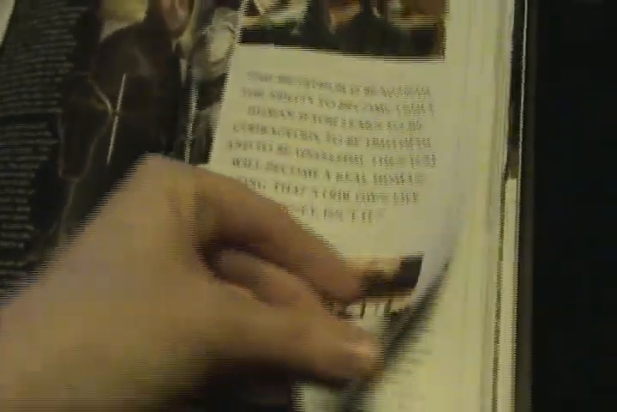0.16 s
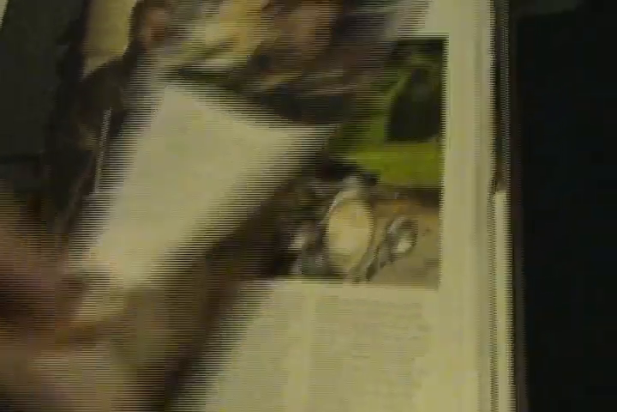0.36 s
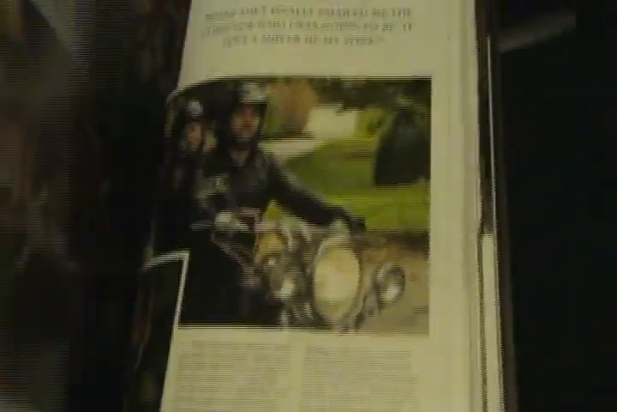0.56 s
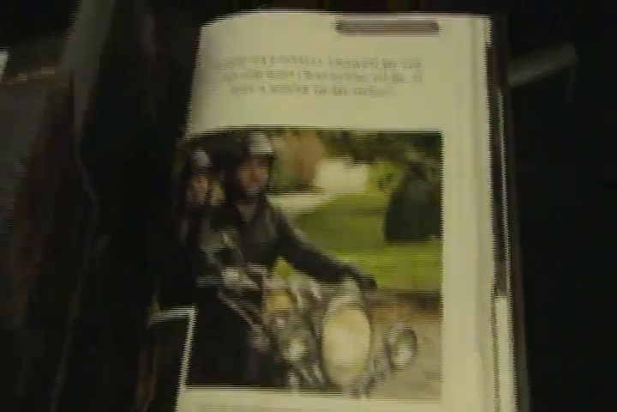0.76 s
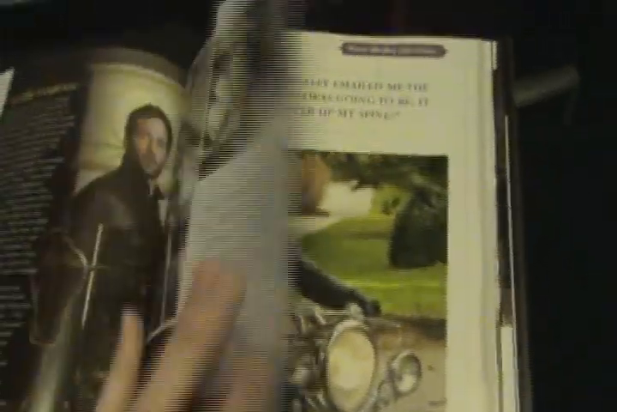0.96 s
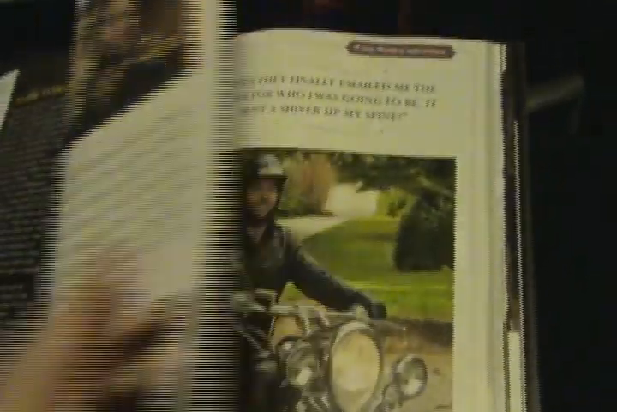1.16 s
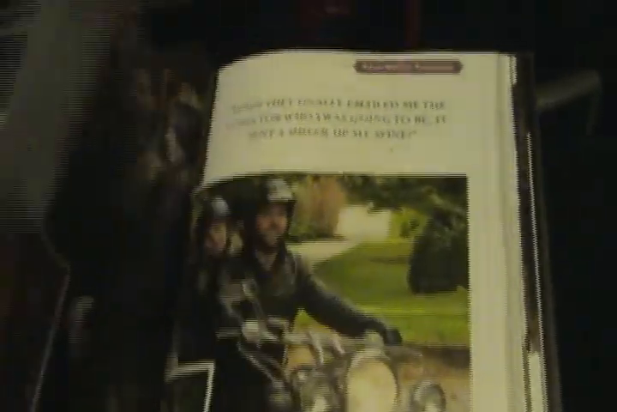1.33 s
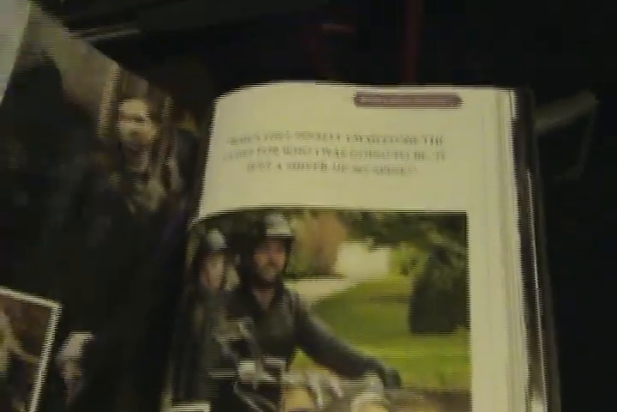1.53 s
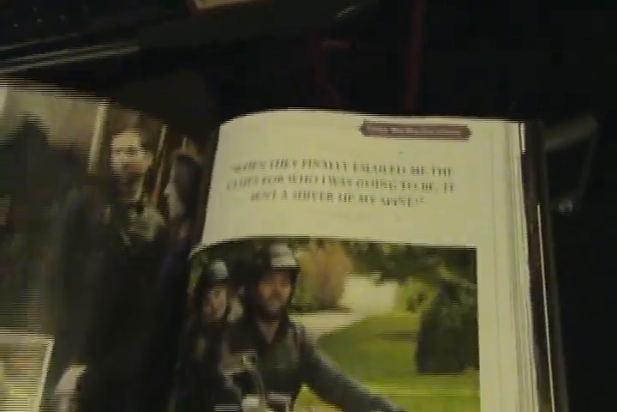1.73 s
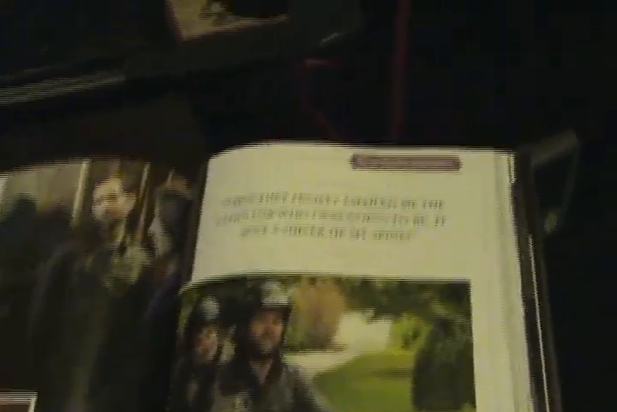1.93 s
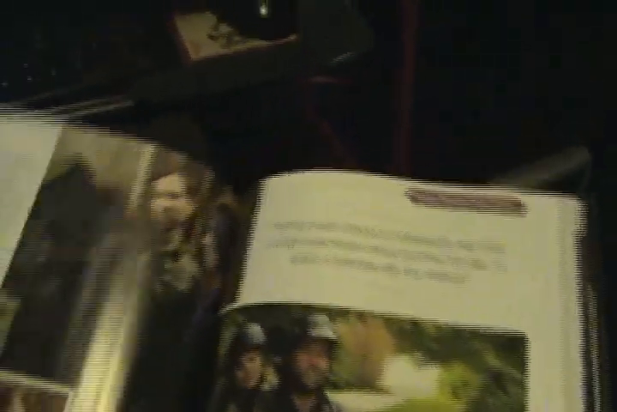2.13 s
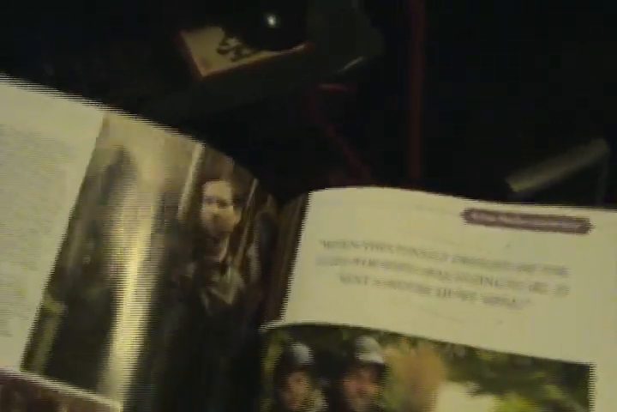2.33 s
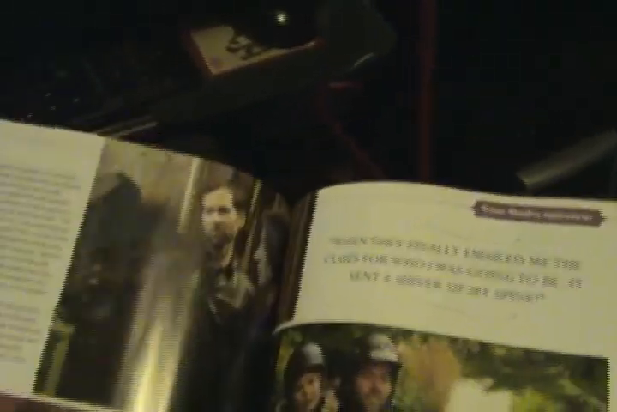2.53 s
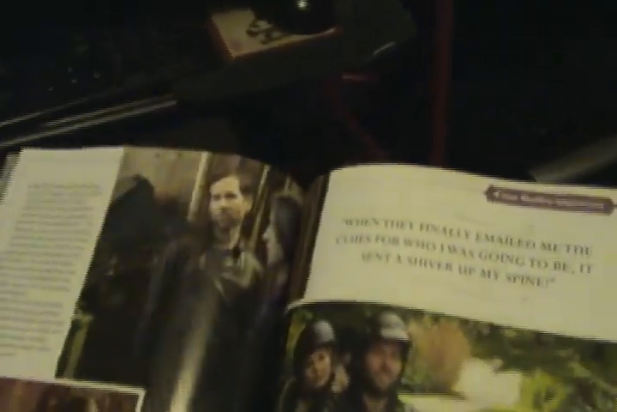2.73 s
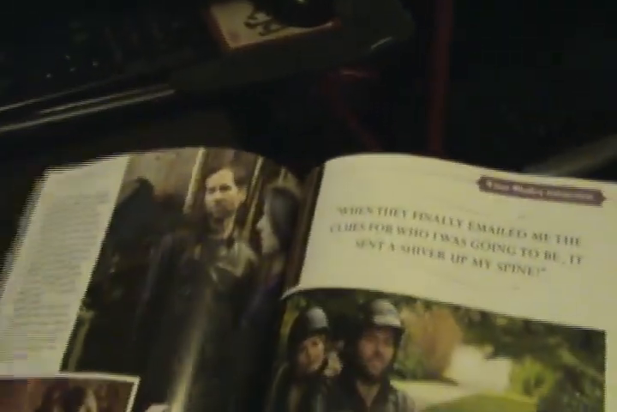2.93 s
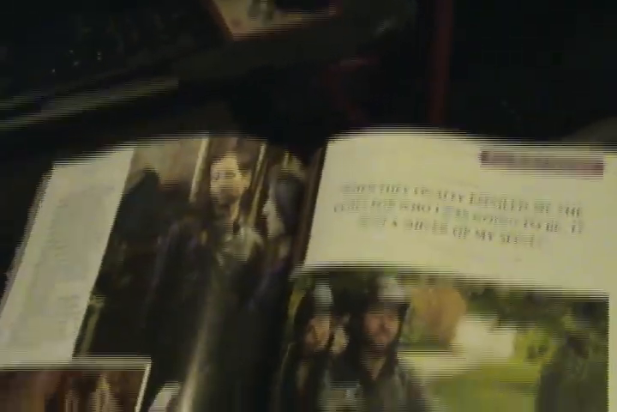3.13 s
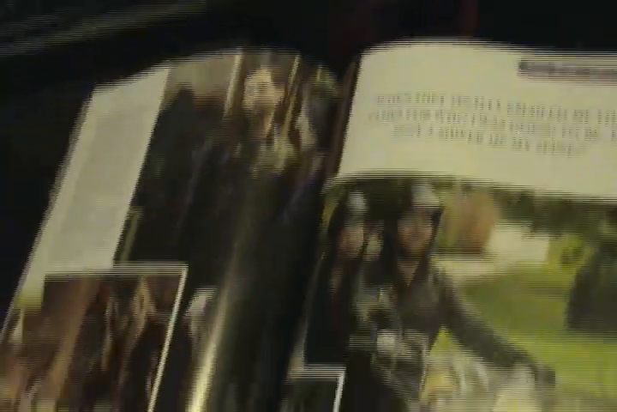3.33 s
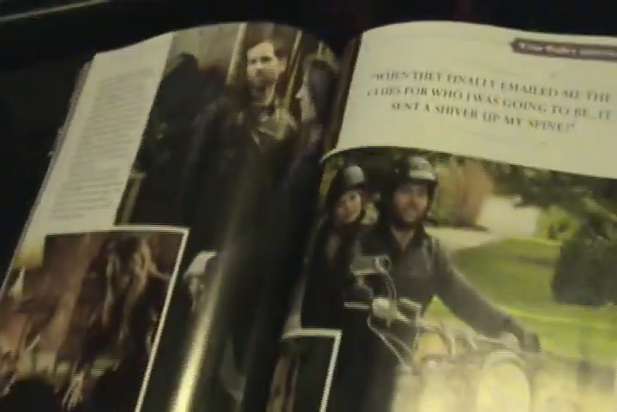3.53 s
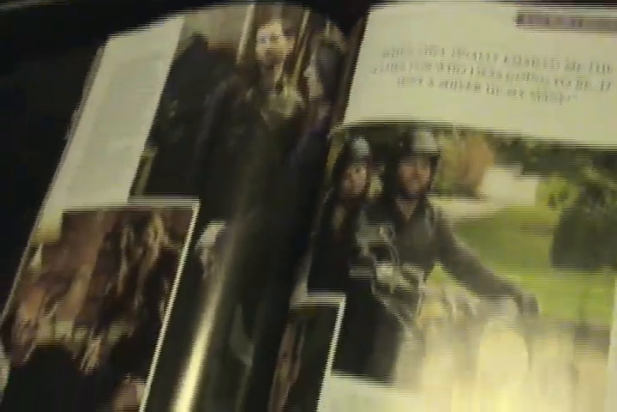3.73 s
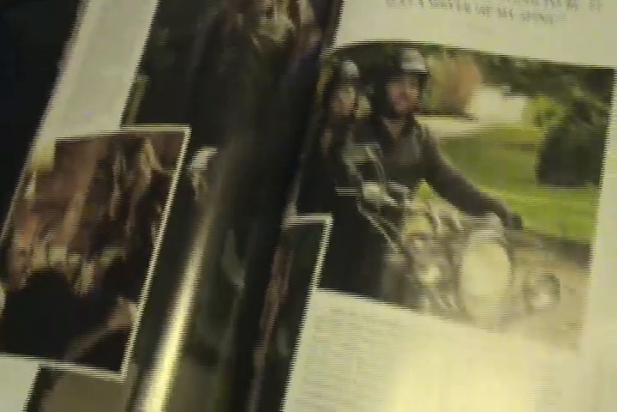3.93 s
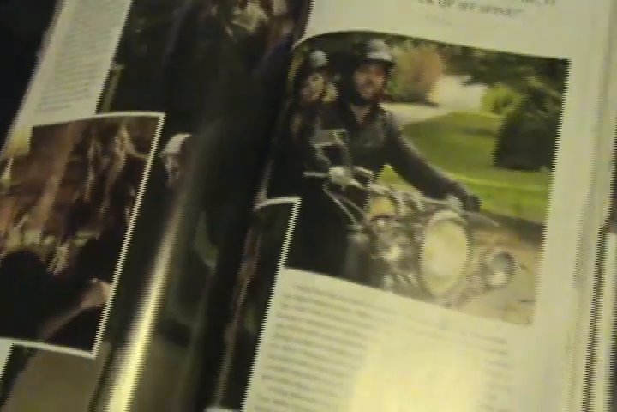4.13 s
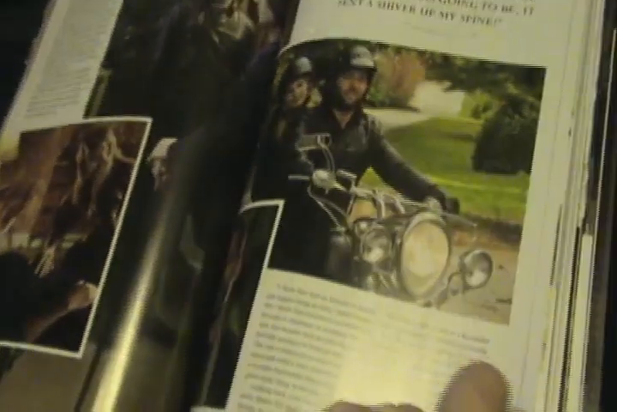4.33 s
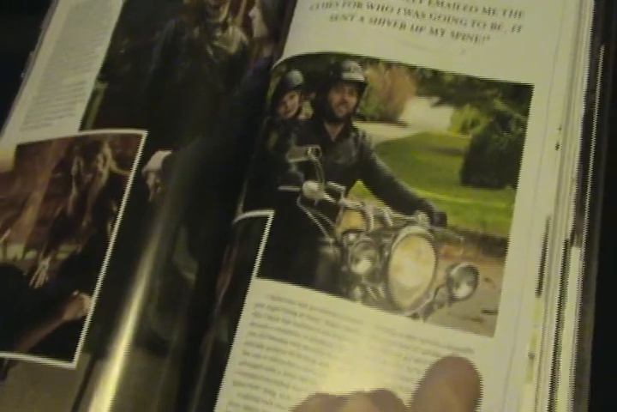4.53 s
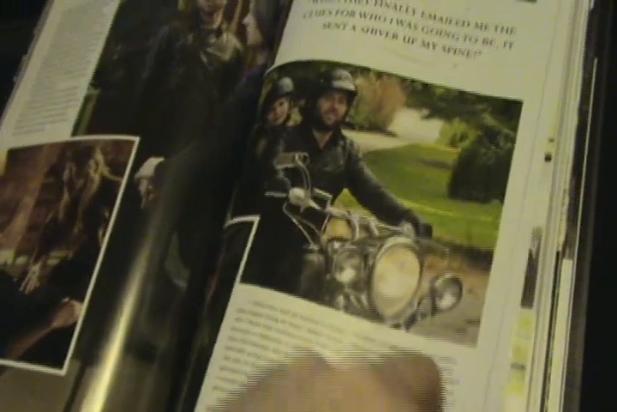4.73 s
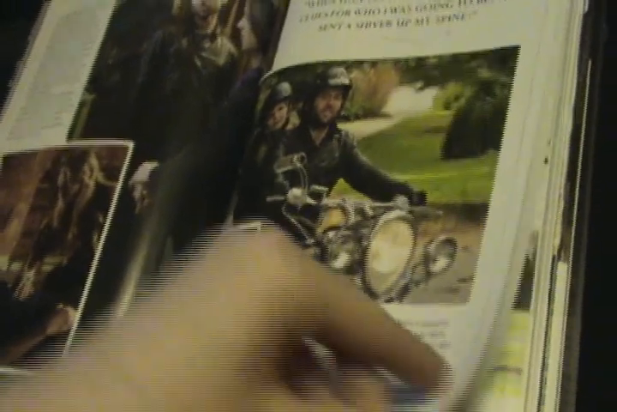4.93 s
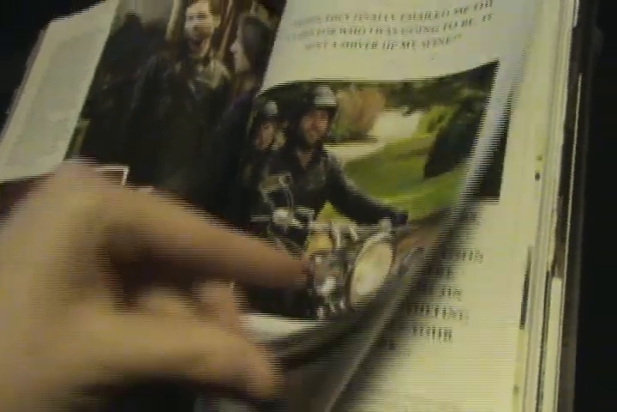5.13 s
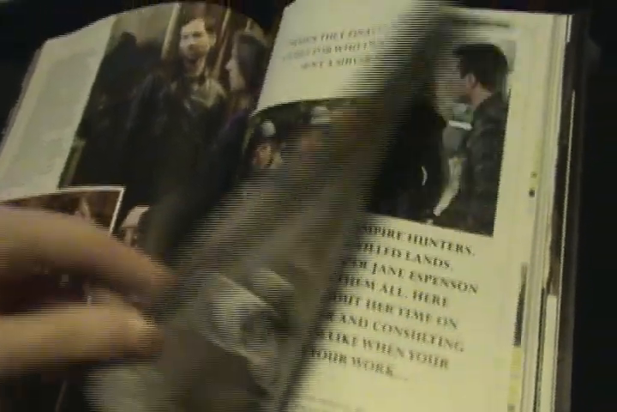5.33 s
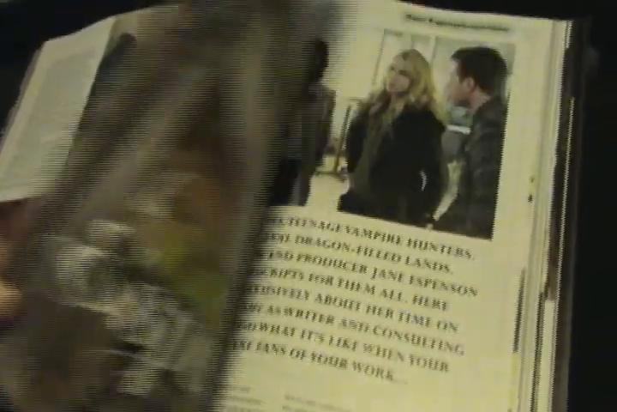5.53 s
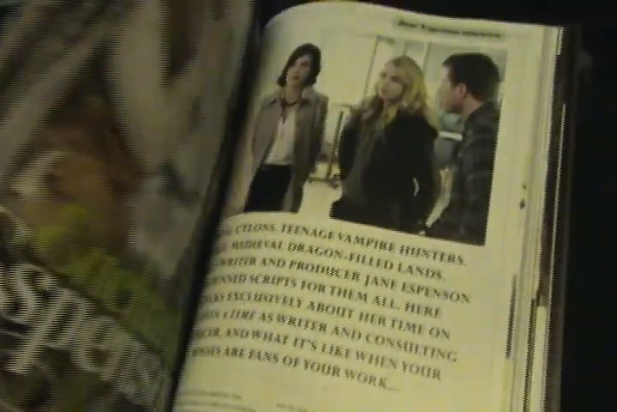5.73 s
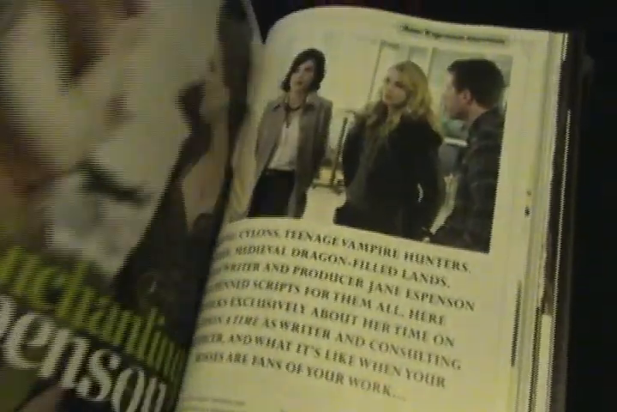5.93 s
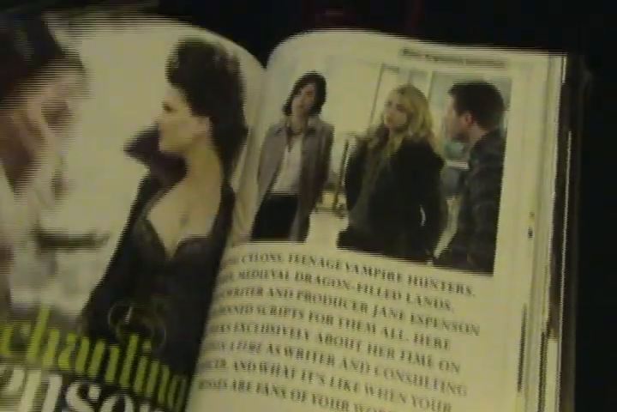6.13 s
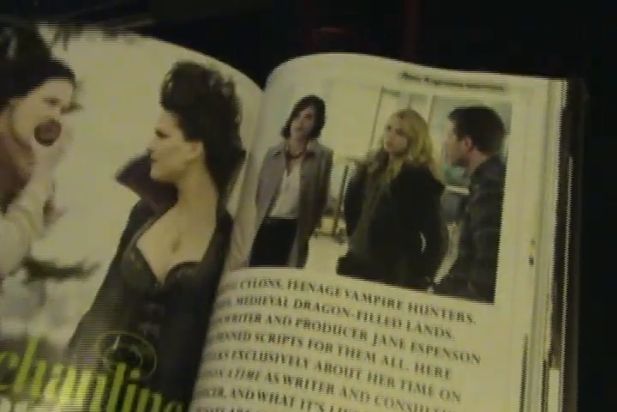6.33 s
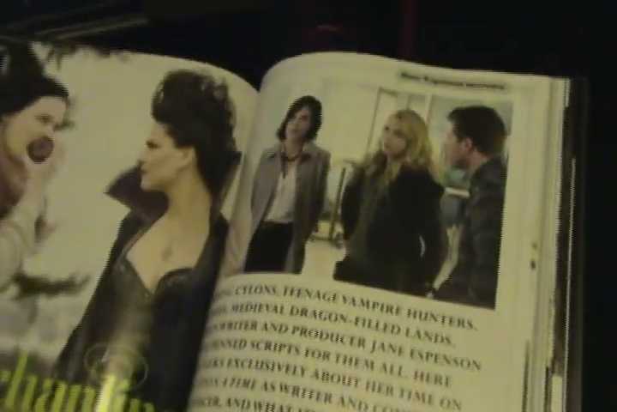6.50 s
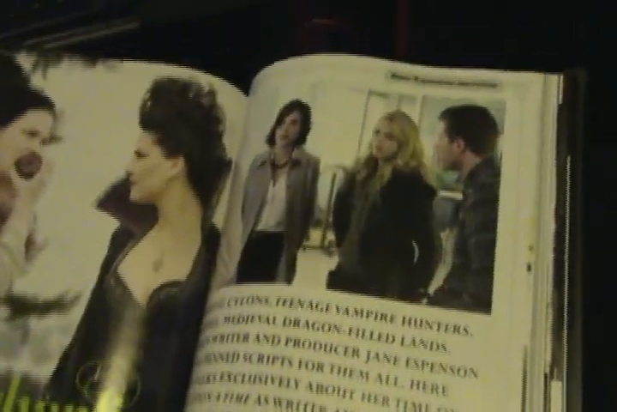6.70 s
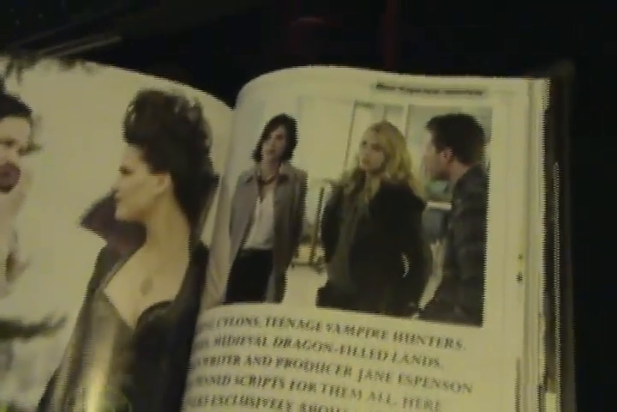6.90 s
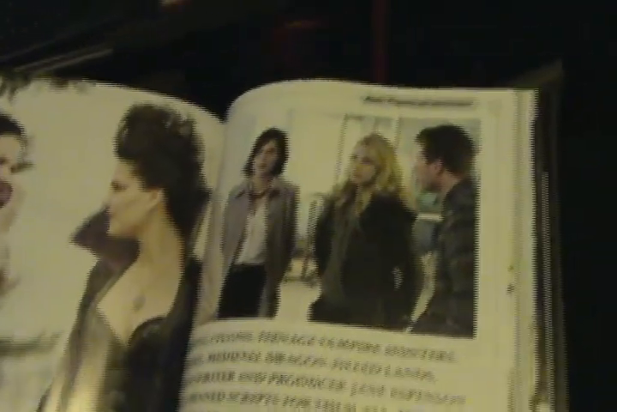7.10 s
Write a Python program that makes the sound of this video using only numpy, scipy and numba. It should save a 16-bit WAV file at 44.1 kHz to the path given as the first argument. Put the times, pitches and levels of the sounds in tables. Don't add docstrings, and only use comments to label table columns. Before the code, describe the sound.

A thick glossy magazine is handled very close to a small stereo microphone in a quiet, fairly dry room. From 0 s a page bends and crackles, with a crisp snap at about 0.1 and a fluttering flap around 0.5. Duller crumples follow near 0.9, then the loudest, densest crackling runs from 1.0 to 1.55, with air puffs and soft thumps of the stack. Around 2.0 to 2.4 come sharp ticks, a short binding creak and small knocks. From 2.5 to 4.2 there is mostly faint rustle and light finger rubbing. Small dry snaps come at 4.3 to 4.7, and a stiff crease at 5.0. Another page turns softly, riffles at 5.6 and lands with a sharp tap at 5.8. Tiny rustles fade by 6.4, leaving a low wavering fan drone, light hiss and a barely audible high whine until about 7.3.

```python
import sys
import numpy as np
from scipy import signal
from scipy.fft import rfft, irfft
from scipy.io import wavfile
from scipy.ndimage import uniform_filter1d
from numba import njit

SR = 44100
rng = np.random.default_rng(int(sys.argv[2]) if len(sys.argv) > 2 else 0)


def level_to_linear(level):
    exponent = np.asarray(level, float) / 20
    return 10 ** exponent


def inscribe(sig):
    pcm = np.round(np.clip(np.atleast_2d(sig).T, -1, 1) * 32767)
    wavfile.write(sys.argv[1], SR, pcm.astype(np.int16))


N = 320166

# [peak t/s, level/dB, length/ms, ring f/Hz]
CRISP_CRACKS = [(.116, -33, .6, 4500), (.119, -31.5, .72, 5100), (.354, -41, 0.72, 7000),
                (.782, -37.5, 4.2, 1770), (1.5015, -29, 2.5, 4230), (1.9728, -43.5, 2.4, 3820),
                (1.987, -47.5, 26, 1560), (2.2113, -40.5, 3.1, 2900), (2.0925, -33, 1.5, 3000),
                (2.121, -44, 1.5, 7000), (.4785, -28, 5, 2800), (.492, -36, 2, 4800), (.51, -39, 2, 5500),
                (.082, -48, 1.5, 7000), (.094, -43, 1.2, 6000), (.9645, -46, 1.2, 7000),
                (1.714, -46, 3, 6000), (5.521, -52, 3, 4000), (2.7974, -46.5, 4.4, 1960),
                (3.3466, -41.5, 0.89, 5650), (4.3105, -38.5, 0.67, 3670), (4.5045, -38, 1.1, 4900),
                (4.6035, -34.5, 1.34, 3950), (4.7103, -43.6, 1.8, 2130), (4.743, -45.5, .8, 3390),
                (5.7623, -48, 1.1, 2100), (5.7948, -30.5, 1.8, 2120), (5.804, -44, 2.8, 1510),
                (5.84, -39, 2.1, 1900), (6.2232, -52.5, 5, 1860)]
DULL_CRACKS = [(.093, -36, 12, 2400), (2.2847, -41, 1.5, 4500), (2.285, -38, 1.5, 1600),
               (5.4691, -48, 1, 1100), (5.4847, -44, 2.5, 1300), (1.506, -24, 6, 2050),
               (.1315, -20.5, 4, 2480), (.346, -28, 6.5, 1300), (.3631, -37, 9, 1750),
               (.5116, -27, 53, 1900), (.8078, -39.5, 12, 1200), (.8717, -28.5, 17, 1390),
               (.8889, -40.5, 6.6, 1550), (1.075, -23.5, 44, 1610), (1.0895, -16, 10, 2540),
               (1.015, -38.5, 8, 1900), (1.0537, -18, 3.3, 3900), (1.058, -17, 5, 2100),
               (1.0905, -28, 4.5, 4600), (1.2625, -36, 5, 6500), (1.381, -24.5, 2.2, 4200),
               (1.47, -39.5, 1, 4500), (4.5575, -45, 2.8, 4500), (4.716, -49.5, 4.5, 6500),
               (5.046, -45, 6, 2600), (5.113, -45.5, 2.9, 4000), (5.119, -54, 6.7, 2400),
               (5.253, -50, 2.7, 3600), (5.755, -45, 2.2, 1100), (5.882, -49, 2, 2000),
               (1.1226, -22.5, 1.5, 1860), (1.137, -36.5, 6.5, 1600), (1.2547, -30.5, 1.7, 5600),
               (1.3195, -33.5, 1.6, 4200), (1.458, -36, 1.8, 1700), (1.551, -27, 2.2, 3200),
               (1.6758, -45.5, 15, 1540), (4.519, -37.5, 4, 4760), (4.555, -26, 0.72, 4300),
               (4.6895, -33, 0.77, 4030), (5.1145, -45, 5, 900), (6.2916, -44, 5.4, 1460),
               (6.3467, -48, 4.3, 1720)]
# [peak t/s, level/dB, length/ms, ring f/Hz]
CRISP_STRAINS = [(.0771, -36, 3.3, 5000), (2.0971, -21.5, 2.06, 3700), (2.1758, -47.5, 41, 3180),
                 (2.643, -48, 29, 3540), (2.8826, -55.5, 32, 2390), (4.3902, -46, 1.6, 5130),
                 (4.41, -48, 4.8, 4900), (5.672, -33.5, 1.5, 2670), (5.775, -47, 2.9, 1390)]
DULL_STRAINS = [(.48, -33, 14, 4500), (.5655, -21.5, 14, 2630), (1.6242, -30.5, 8.1, 1430),
                (1.7192, -39.5, 42, 1310), (5.0415, -29.5, 6.2, 6340)]
# [peak t/s, level/dB, length/ms, ring f/Hz]
CRISP_CRUMPLES = [(.0604, -32, 2.4, 6030), (.0655, -30.5, 1.8, 8100), (.2439, -49, 5.5, 3370),
                  (1.023, -45.5, 1, 9000), (1.167, -53, 1, 9000), (1.513, -43.5, 0.93, 9000),
                  (5.27, -55, 1, 8530), (5.2855, -47.5, 1.3, 8200), (1.226, -46, 3.3, 1400),
                  (1.2461, -42, 3.7, 1460), (1.704, -39.5, 1.9, 4500), (2.1123, -35.5, 4.3, 2680),
                  (4.5359, -45, 1.05, 4830), (5.457, -57, 1.1, 1580), (5.6444, -35, .51, 1990),
                  (6.134, -48, 2.2, 2710)]
DULL_CRUMPLES = [(.052, -34, 3.7, 6100), (.4872, -21, 3.4, 3400), (.527, -18.5, 7, 3160),
                 (.585, -27, 12.3, 1950), (.3935, -38.5, 3.3, 2000), (.7922, -33.5, 6.1, 1444),
                 (.8285, -38, 2.9, 1034), (.8573, -32.5, 13, 1670), (.905, -31, 4, 3300),
                 (.528, -26, 8, 4300), (2.321, -40, 1.5, 1500), (2.363, -42, 2.5, 1500),
                 (.842, -38, 5, 3200), (.962, -44, 5, 1800), (.544, -26, 4, 3500), (5.676, -44, 1.5, 2800),
                 (5.667, -48, 2, 3300), (.9144, -28, 5.8, 1534), (1.1545, -22, 0.58, 1170),
                 (1.172, -35.5, 3.4, 1150), (1.026, -34, 4.7, 2615), (5.3655, -50, 2.8, 1290),
                 (1.2827, -29.5, 25, 1500), (1.3022, -26.5, 2.4, 3000), (1.3552, -17.5, 5.2, 2820),
                 (1.4009, -26, 3.8, 2230), (1.4186, -27.5, 11, 2150), (1.433, -38, 2.3, 2160),
                 (1.042, -20.5, 10.6, 1715), (1.39, -15.5, 4.9, 3366), (1.5183, -20, 3.5, 2100),
                 (2.3214, -34.5, 1.7, 3770), (2.361, -43, 1.4, 4600), (2.365, -43, 1.4, 4600),
                 (6.1558, -41.5, 11.2, 1450)]
CRACK_RISE, STRAIN_FALL = 0.36, 0.35
CRISP_EDGE_DB, DULL_EDGE_DB, EDGE_DB_PER_DB = -10.5, -30, -0.15

# [start t/s, end t/s, level/dB, centre f/Hz]
WIPES = [(0, 0.06, -52.5, 5740), (.05, 0.178, -54.5, 8000), (0.2, 0.397, -54.5, 6460),
         (0.448, 0.497, -44, 7500), (0.831, 0.849, -49, 7400), (1.226, 1.247, -50, 7500),
         (1.26, 1.362, -51, 6500), (1.38, 1.5, -45.5, 4870), (1.46, 1.545, -53, 6500),
         (1.7, 1.93, -59, 5000), (1.98, 2.133, -51, 5470), (2.09, 2.229, -52, 6200),
         (2.605, 2.67, -59, 6800), (2.69, 2.833, -61.5, 6000), (3.065, 3.53, -64.5, 6250),
         (4.95, 5.07, -55, 6100), (5.027, 5.103, -62, 7000), (5.24, 5.305, -63, 4500),
         (5.642, 5.683, -58, 6300), (5.645, 5.69, -54, 2500), (.968, 1.005, -57, 8500),
         (5.787, 5.994, -62, 1420), (5.792, 5.815, -45, 6300), (5.816, 5.994, -60, 6450),
         (6.098, 6.344, -66, 5400)]
# [start t/s, end t/s, level/dB, centre f/Hz]
RUBS = [(1.565, 1.677, -51.5, 6600), (2.1, 2.175, -45, 496), (.85, .93, -41, 850), (1.03, 1.14, -36, 950),
        (.97, .997, -55, 7000), (1.675, 1.75, -46, 1400), (5.648, 5.663, -46, 1100),
        (5.663, 5.682, -48, 900), (2.315, 2.495, -60.5, 6140), (3.686, 3.817, -64.5, 6960),
        (3.78, 3.932, -65, 3650), (3.96, 3.998, -64.5, 6000), (4.098, 4.231, -58, 6900),
        (4.257, 4.335, -58.5, 6050), (4.376, 4.51, -45, 5530), (4.41, 4.513, -50, 3330),
        (4.755, 4.81, -58.5, 2500), (4.76, 4.963, -59, 9100), (5.47, 5.538, -57, 8800)]
WIPE_WIDTH, RUB_WIDTH = 1.15, .45

# [peak t/s, rise/ms, fall/ms, sheet level/dB, flexing stack level/dB]
BENDS = [(0, 50, 90, -52.5, -71), (.13, 110, 230, -69, -56.5), (.524, 214, 37, -46.5, -67),
         (.628, 47, 33, -58, -45.5), (.854, 41, 87, -65, -45), (1.12, 110, 94, -48, -50),
         (1.27, 60, 110, -53, -43), (1.478, 120, 110, -49, -47), (1.72, 60, 25, -56, -54),
         (1.85, 60, 90, -63, -72), (2.04, 35, 97, -55.5, -57), (2.19, 86, 24, -53, -48),
         (2.36, 110, 110, -57, -58), (2.7, 250, 200, -60, -66), (3.25, 110, 165, -57.5, -62),
         (3.82, 130, 280, -64.5, -84.5), (4.4, 185, 330, -62, -71), (4.6, 44, 71, -66.5, -68),
         (5.01, 145, 66, -56.5, -84), (5.2, 60, 130, -94, -67), (5.44, 190, 340, -61.5, -63),
         (5.805, 10, 25, -66, -39.5), (5.9, 46, 50, -60, -52.5), (6.21, 34, 86, -66, -58),
         (6.34, 88, 77, -76, -57), (7.2, 320, 300, -75, -70)]
# [f/Hz, width/Hz]
SHEET_MODES = [(850, 700), (1500, 1100), (2500, 1800), (4000, 2500)]
SHEET_MODES_DB = [7, 0, -12, -4.5]
# [t/s, level/dB, length/ms]
AIR_PUSHES = [
    (.09, -45.5, 36),
    (.51, -36.5, 18),
    (.87, -51, 55),
    (1.079, -57, 29),
    (1.27, -36.5, 22),
    (1.39, -38.5, 21),
    (1.512, -47, 40),
    (1.625, -45, 15),
]

# [t/s, slips, first gap/ms, last gap/ms, first level/dB, last level/dB, f/Hz]
RIFFLE = (5.6122, 10, 2.3, 3.6, -38, -28, 740)
# [peak t/s, level/dB, length/ms, ring f/Hz]
KNOCKS = [(0.0874, -40.5, 20, 446), (0.3666, -43, 11, 643), (0.526, -39, 27, 453), (0.5798, -38.5, 16, 600),
          (0.8777, -37.5, 2.1, 423), (1.155, -33, 2.2, 720), (1.285, -39, 44, 433), (1.3552, -30, 3.4, 613),
          (1.3876, -32.5, 15, 593), (1.5037, -45, 6.5, 600), (1.552, -42, 5.9, 570),
          (1.9885, -31.5, 0.71, 603), (2.0956, -30, 3.24, 520), (2.1137, -27, 1.1, 565),
          (2.2975, -42, 1, 600), (1.628, -39, 7, 420), (2.342, -45, 2.4, 600), (.0888, -34, .6, 800),
          (5.459, -48, .6, 700), (5.655, -42, 2.4, 800), (5.677, -40, 1, 600), (5.1135, -44, 1.5, 1000),
          (2.216, -33, 1.3, 516), (2.2862, -28.5, 0.53, 536), (2.3214, -25, 0.8, 526),
          (2.3635, -30.5, 2.4, 480), (2.884, -54.5, 8.9, 546), (4.6912, -42.5, 0.61, 730),
          (5.4771, -39.5, 0.84, 410), (5.524, -43, 3.22, 437), (5.6452, -33.5, 3.16, 417),
          (5.6731, -29, 0.82, 396), (5.772, -45.5, 4.1, 467), (5.7953, -18.5, 0.17, 520),
          (5.8404, -26, 0.3, 470), (.057, -42, 4.2, 800), (0.076, -36, 2, 500), (4.3112, -45, 0.35, 1010),
          (4.5042, -48, 0.46, 1000), (4.519, -48, 0.54, 1000), (4.537, -49, .5, 900),
          (4.5553, -44, 0.54, 1090), (4.6038, -46, .5, 1110), (4.7105, -44, 0.46, 900), (5.8, -37, 1, 700),
          (5.8055, -39, 0.76, 597), (5.818, -44, 1, 600), (5.859, -44, 1.5, 450)]
# [t/s, slips, gap/ms, first level/dB, last level/dB, slip length/ms, f/Hz]
CREAK = (2.1215, 8, 11.5, -39, -33.5, 2.4, 505)

# [f/Hz, left lead/rad]
PORT_PHASE = [(30, 0), (340, .55), (900, .9), (2400, .5), (4500, .35), (16000, .4)]
# [f/Hz, left minus right level/dB]
PORT_BALANCE = [(60, -1.4), (400, -1.4), (1300, 1.8), (2400, 2.6), (15000, 1.6)]
# [t/s, extra left minus right level/dB]
HAND_SIDE = [(0, -1), (1.4, 0.5), (1.8, 1.5), (3.3, .5), (4, -4.5), (5.2, -1.5), (5.8, 1.5), (7.26, -1)]
ROOM_T60_S, ROOM_DB, ROOM_HZ = .18, -17, 3500

# [f/Hz, density level/dB per Hz]
FLOOR_MID = [(25, -36.5), (55, -8.5), (100, -7), (250, -10), (400, -16.5), (700, -29.5), (1500, -31),
             (16000, -33)]
FLOOR_SIDE = [(15, -64.5), (25, -35.5), (175, -2), (591, -7), (887, -4), (14000, -27.5), (16000, -44.5)]
FLOOR_MID_DB, FLOOR_SIDE_DB = -58, -61
# [f/Hz, width/Hz, level/dB]
DRONE = [
    (192, 26, -61.5),
    (246, 22, -68),
    (137, 20, -68),
    (11531, 60, -81),
    (15734, 8, -87),
]
HUM_HZ, HUM_WAVER_HZ, HUM_DB, HUM_SWAY_DB = 194, 6, -62, 4

DUCK_DB, DUCK_RATIO, DUCK_RELEASE_S = -13.5, 2, 0.14
TOP_HZ = 15800


def unit(x):
    return x / np.sqrt(np.mean(x ** 2))


def ring(x, hz, width_hz):
    return signal.lfilter(*signal.iirpeak(min(hz, .45 * SR), max(hz / width_hz, .2), fs=SR), x)


def band(x, lo_hz, hi_hz):
    return signal.sosfilt(signal.butter(2, [lo_hz, hi_hz], "band", fs=SR, output="sos"), x)


def low(x, hz):
    return signal.sosfilt(signal.butter(3, min(hz, 14000), fs=SR, output="sos"), x)


def along(table):
    hz, value = np.transpose(table)
    return np.interp(np.log(np.fft.rfftfreq(N, 1 / SR) + 1), np.log(hz + 1), value)


def walk(rate_hz):
    hold = max(int(SR / rate_hz), 1)
    steps = np.repeat(rng.standard_normal(N // hold + 1), hold)
    return unit(uniform_filter1d(steps, hold)[:N])


def grains(rate_hz, spread_db):
    chance, size, sign = rng.random(N), rng.exponential(size=N), rng.standard_normal(N)
    return unit((chance < rate_hz / SR) * level_to_linear(spread_db * np.minimum(size, 4)) * sign)


def swell(t_s, rise_ms, fall_ms):
    span_ms = np.where(t_s < 0, max(rise_ms, .1), max(fall_ms, .2))
    return np.exp(-np.abs(t_s) * 1000 / span_ms)


def add(track, start_s, sound):
    i = int(start_s * SR)
    track[..., i:i + sound.shape[-1]] += sound[..., :N - i]


def creases():
    kinds = [(CRISP_CRACKS, CRACK_RISE, 1, CRISP_EDGE_DB), (DULL_CRACKS, CRACK_RISE, 1, DULL_EDGE_DB),
             (CRISP_STRAINS, 1, STRAIN_FALL, CRISP_EDGE_DB), (DULL_STRAINS, 1, STRAIN_FALL, DULL_EDGE_DB),
             (CRISP_CRUMPLES, 1, 1, CRISP_EDGE_DB), (DULL_CRUMPLES, 1, 1, DULL_EDGE_DB)]
    return [(s, db, rise * ms, fall * ms, hz, edge_db + EDGE_DB_PER_DB * (db + 36.5))
            for table, rise, fall, edge_db in kinds for s, db, ms, hz in table]


def snaps():
    out, t = np.zeros(N), np.arange(-1024, 3072) / SR
    for s, db, rise_ms, fall_ms, hz, edge_db in creases():
        noise, flicker, drift = rng.standard_normal((3, len(t)))
        lumps_db = 2.3 * unit(uniform_filter1d(drift, size=70))
        volley = noise * level_to_linear(1.8 * flicker + lumps_db)
        clean = np.clip(1.6 - (rise_ms + fall_ms) / 2.2, 0, 1)
        volley = (1 - .6 * clean) * volley + (t == 0) * 9 * clean
        shape = swell(t, rise_ms * (1 - .7 * clean), fall_ms)
        shape = shape ** (1 - .3 * np.log(np.where(t < 0, shape, 1) + 1e-9))
        body = ring(volley * shape, hz, (1.96 - 1.3 * clean) * hz)
        body = low(ring(body, hz, min(3.0 * hz, SR / 4)), 1.68 * hz)
        edge = band(volley * shape ** 1.8, 3800, 12000)
        edge = low(ring(edge, 5500, 5000), 12000)
        energy = level_to_linear(db + 0.5) * np.sqrt(np.sum(shape ** 2) + 30)
        crack = unit(body) + level_to_linear(edge_db + 3.5) * unit(edge)
        add(out, s + t[0], energy * crack / np.sqrt(len(t)))
    return out


def slides():
    out = np.zeros(N)
    rub = grains(14000, 1.6) * level_to_linear(1.1 * walk(70))
    strokes = [(*row, WIPE_WIDTH * row[-1]) for row in WIPES]
    strokes += [(*row, RUB_WIDTH * row[-1]) for row in RUBS]
    for start_s, end_s, db, hz, width_hz in strokes:
        part = rub[int(start_s * SR):int(end_s * SR)]
        u = np.linspace(0, 1, len(part))
        shape = np.minimum(u / .2, .7 + .5 * u) * np.minimum((1 - u) / .12, 1)
        hiss = ring(ring(part, hz, width_hz), hz, width_hz)
        add(out, start_s, level_to_linear(db) * shape * unit(low(hiss, hz + width_hz)))
    return out


def rustle():
    t = np.arange(N) / SR
    bends = np.array([swell(t - s, rise_ms, fall_ms) for s, rise_ms, fall_ms, _, _ in BENDS])
    sheet_gain, flex_gain = level_to_linear(np.array(BENDS)[:, -2:].T) @ bends
    jerk = walk(45)
    buckles = grains(5000, 2.3)
    sheet = sum(level_to_linear(db) * ring(buckles, *mode) for mode, db in zip(SHEET_MODES, SHEET_MODES_DB))
    sheet = unit(low(sheet, 9000))
    flex = unit(band(buckles, 120.0, 870))
    gusts = sum(level_to_linear(db) * swell(t - s, ms, ms) for s, db, ms in AIR_PUSHES)
    air = unit(band(rng.standard_normal(N), 57, 260))
    flicker_db = 1.5 * jerk + 1.6 * walk(130)
    return sheet * sheet_gain * level_to_linear(flicker_db) + flex * flex_gain * level_to_linear(2.2 * jerk) + air * gusts


def riffle():
    start_s, slips, first_ms, last_ms, first_db, last_db, hz = RIFFLE
    slips = int(round(slips))
    times_s = start_s + np.cumsum(np.linspace(first_ms, last_ms, slips)) / 1000
    slip_db = np.linspace(first_db, last_db, slips) + 1.5 * rng.standard_normal(slips)
    kicks = np.zeros(N)
    kicks[(times_s * SR).astype(int)] = -level_to_linear(slip_db)
    return level_to_linear(29) * ring(kicks, hz, .7 * hz) + level_to_linear(5) * low(kicks, 3600)


def knocks():
    out, t = np.zeros(N), np.arange(-1024, 3072) / SR
    start_s, slips, gap_ms, first_db, last_db, slip_ms, creak_hz = CREAK
    slips_db = np.linspace(first_db, last_db, int(slips))
    creak = [(start_s + k * gap_ms / 1000, db, slip_ms, creak_hz) for k, db in enumerate(slips_db)]
    for s, db, length_ms, hz in KNOCKS + creak:
        rumble = unit(band(rng.standard_normal(len(t)), 0.34 * hz, 2.08 * hz))
        loose = np.clip((length_ms - 2.6) / 1.0, 0, 1)
        tone = (1 - loose) * np.sin(2 * np.pi * hz * t) + 1.07 * loose * rumble
        shape = swell(t, 0.78 * length_ms + 0.092, 0.7 * length_ms + .5)
        add(out, s + t[0], level_to_linear(db + 5.5) * shape * tone)
    return out


def ports(x):
    half = level_to_linear(along(PORT_BALANCE) / 2) * np.exp(.5j * along(PORT_PHASE))
    lean_db = np.interp(np.arange(N) / SR, *np.transpose(HAND_SIDE)) / 2
    return irfft(rfft(x) * np.array([half, 1 / half]), N) * level_to_linear(np.array([lean_db, -lean_db]))


def room(x):
    t = np.arange(SR // 2) / SR
    tail = rng.standard_normal((2, len(t))) * level_to_linear(-60 * t / ROOM_T60_S) * (t > .003)
    tail[1] = .6 * tail[0] + .8 * tail[1]
    tail = low(band(tail, ROOM_HZ / 6, ROOM_HZ), 2 * ROOM_HZ)
    tail = tail / np.sqrt(np.sum(tail ** 2) / 2)
    return level_to_linear(ROOM_DB) * signal.fftconvolve(x, tail, axes=1)[:, :N]


def shaped_noise(spectrum):
    return unit(irfft(rfft(rng.standard_normal(N)) * level_to_linear(along(spectrum)), N))


def floor():
    mid, side = shaped_noise(FLOOR_MID), shaped_noise(FLOOR_SIDE)
    drone = sum(level_to_linear(db) * unit(ring(ring(rng.standard_normal(N), hz, width_hz), hz, width_hz))
                for hz, width_hz, db in DRONE)
    turning_rad = 2 * np.pi * np.cumsum(HUM_HZ + HUM_WAVER_HZ * walk(9)) / SR
    hum = level_to_linear(HUM_DB + HUM_SWAY_DB * walk(7)) * np.sqrt(2) * np.sin(turning_rad)
    return level_to_linear(FLOOR_MID_DB) * mid + drone + hum + level_to_linear(FLOOR_SIDE_DB) * side * np.array([[1], [-1]])


def scene():
    paper = (snaps() + slides() + rustle() + riffle() + knocks())[None]
    return ports(paper) + room(paper) + floor()


@njit
def follow(x, attack, release):
    y, level = np.empty(len(x)), 0.
    for i in range(len(x)):
        level += (x[i] - level) * (attack if x[i] > level else release)
        y[i] = level
    return y


def band_limit(x):
    return signal.sosfilt(signal.butter(12, 16550, fs=SR, output="sos"), x)


def record(dry):
    envelope = follow(np.abs(dry).max(axis=0), 0.0079, 1 / (DUCK_RELEASE_S * SR))
    over = np.minimum(level_to_linear(DUCK_DB) / (envelope + 1e-9), 1)
    gain = over ** (1 - 1 / max(DUCK_RATIO, 1))
    top_cut = signal.ellip(8, .3, 45, TOP_HZ, fs=SR, output="sos")
    mix = signal.sosfilt(top_cut, dry * gain)
    return band_limit(mix)


dry = scene()
out = record(dry)
inscribe(out)
```